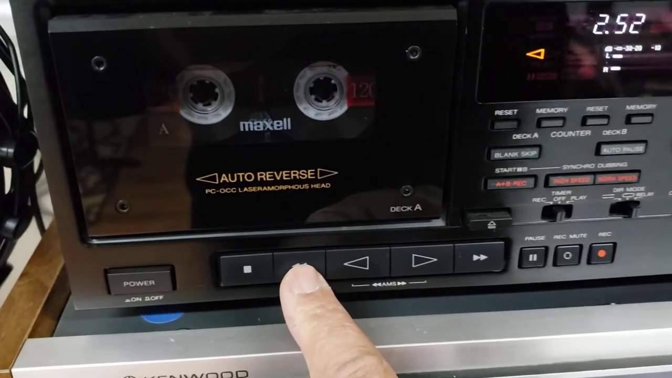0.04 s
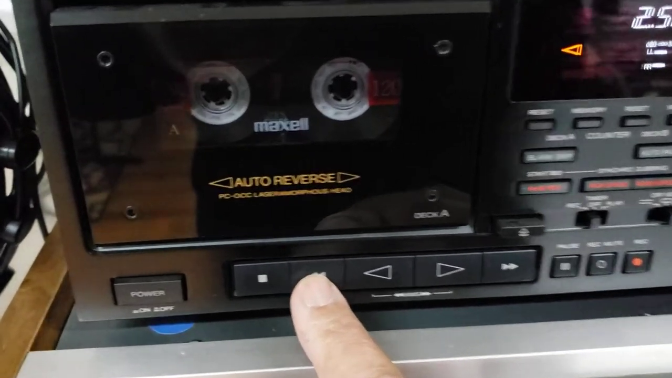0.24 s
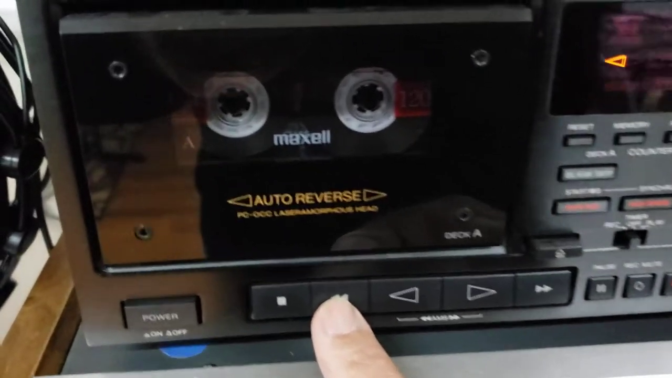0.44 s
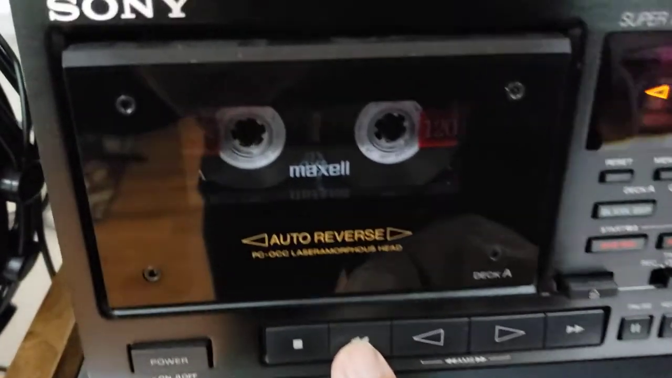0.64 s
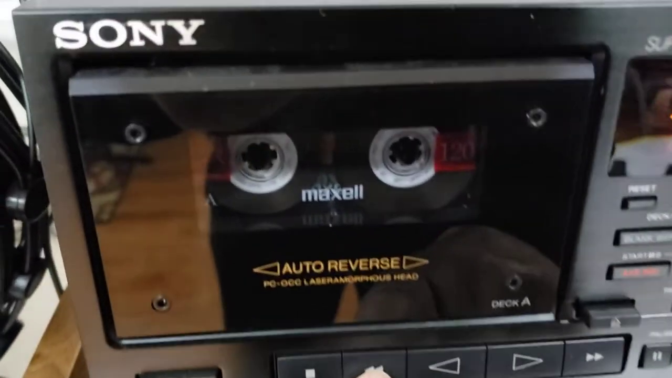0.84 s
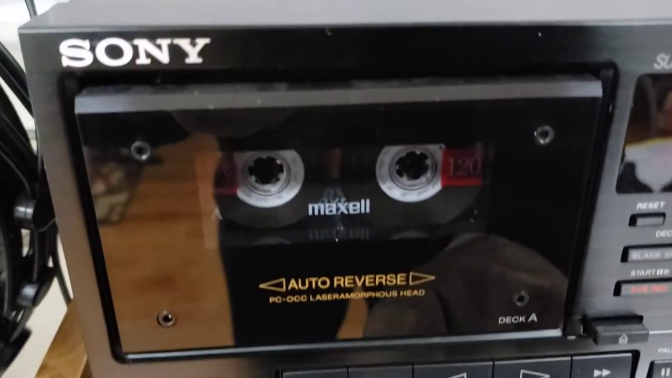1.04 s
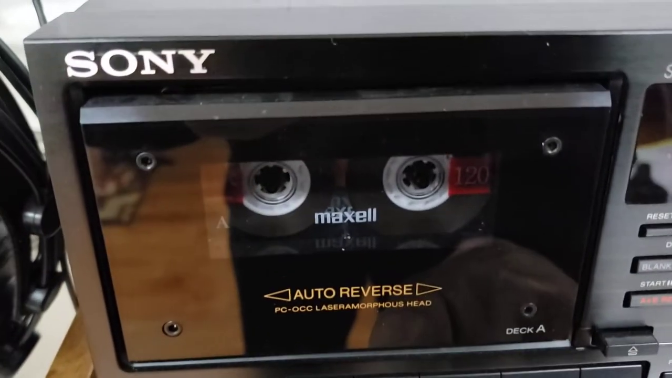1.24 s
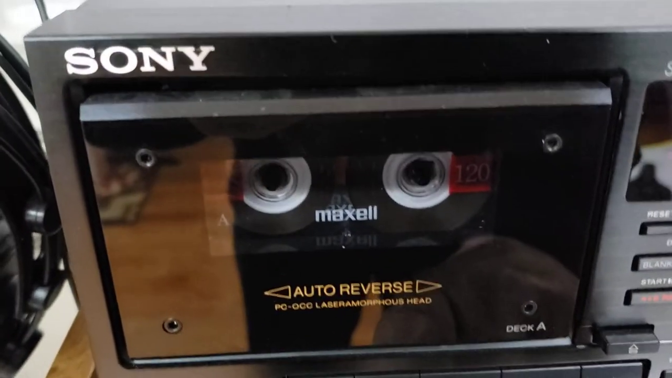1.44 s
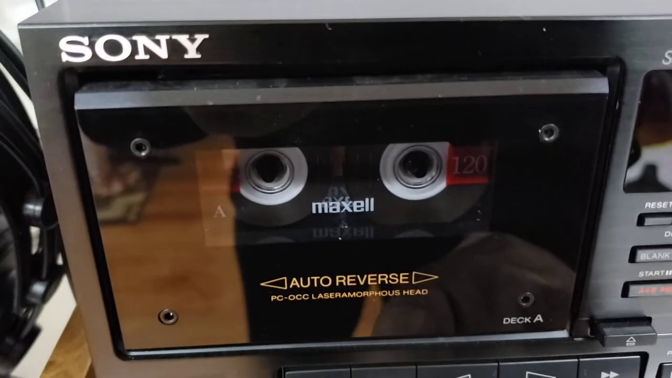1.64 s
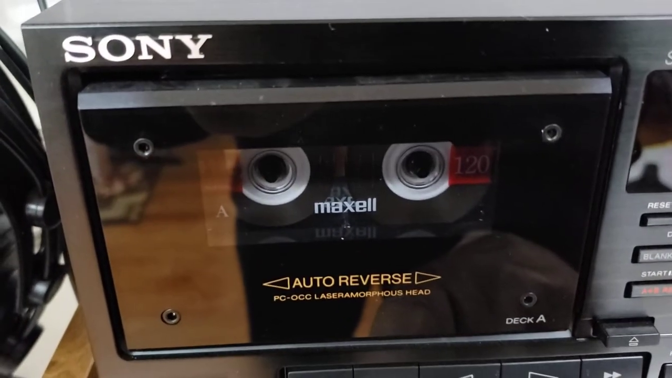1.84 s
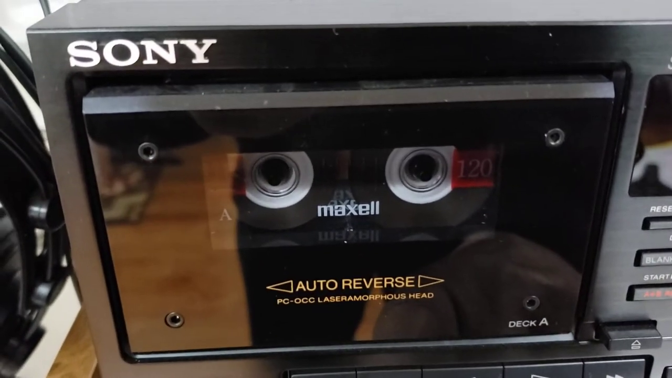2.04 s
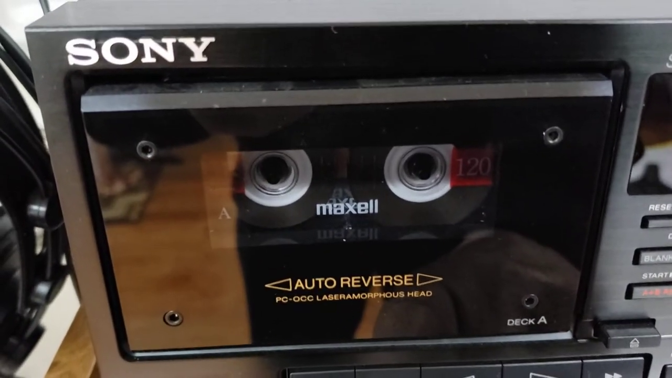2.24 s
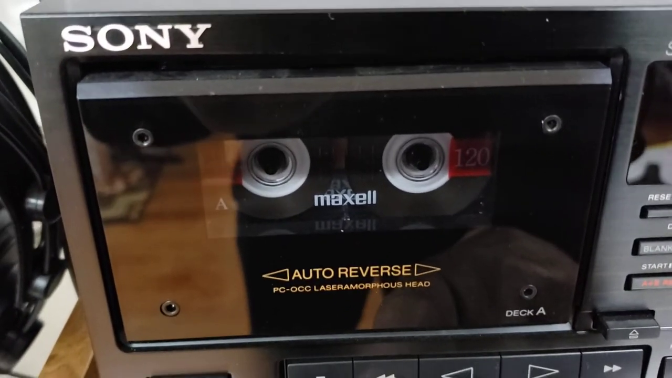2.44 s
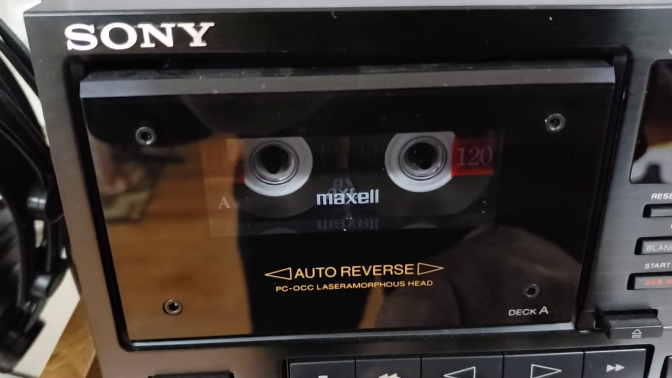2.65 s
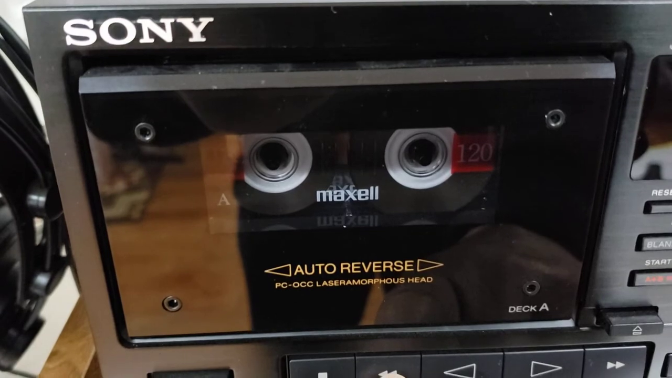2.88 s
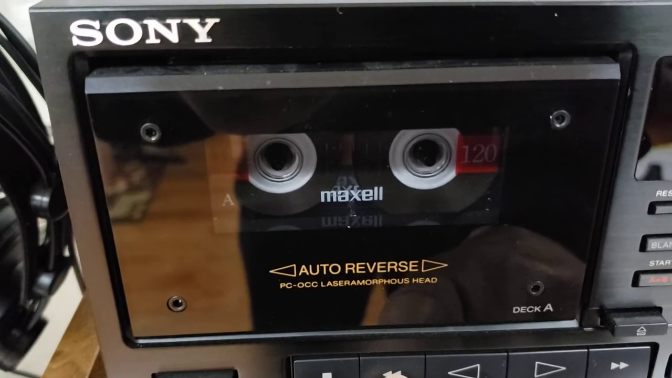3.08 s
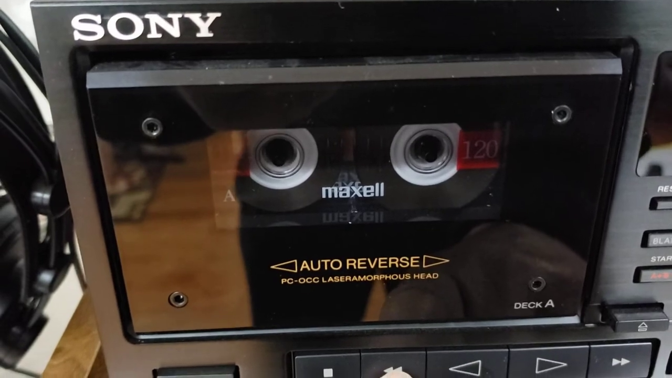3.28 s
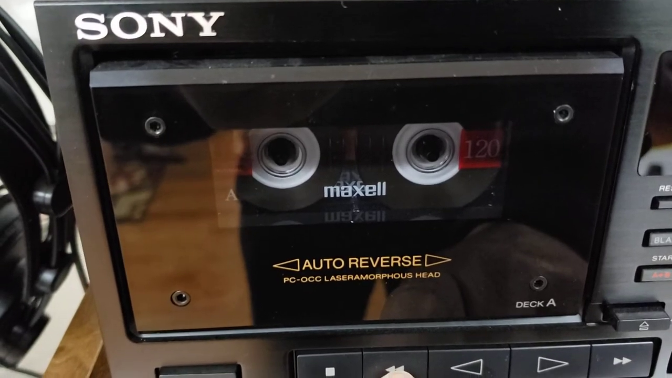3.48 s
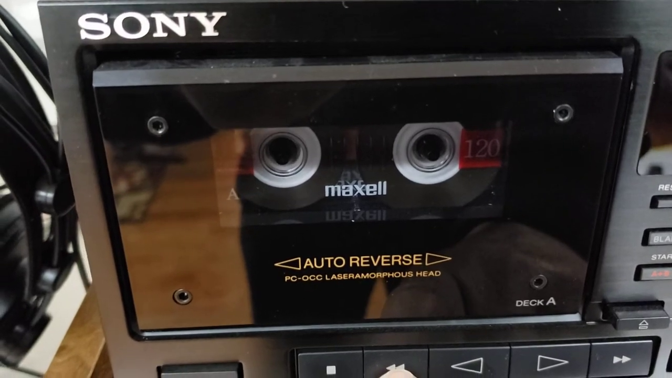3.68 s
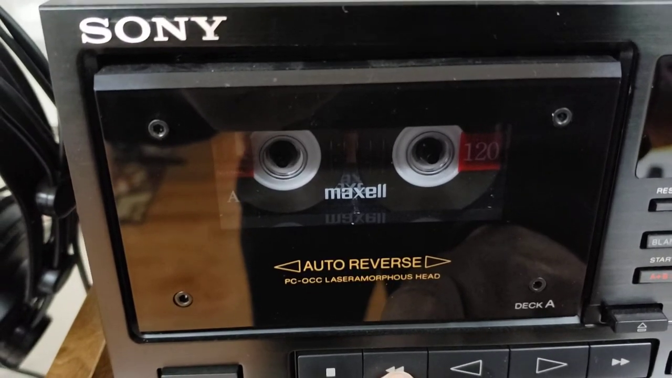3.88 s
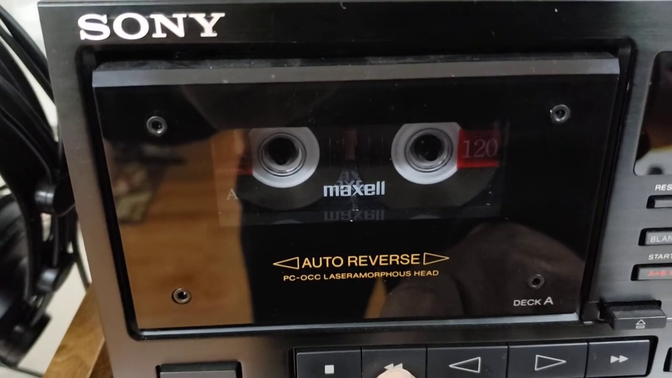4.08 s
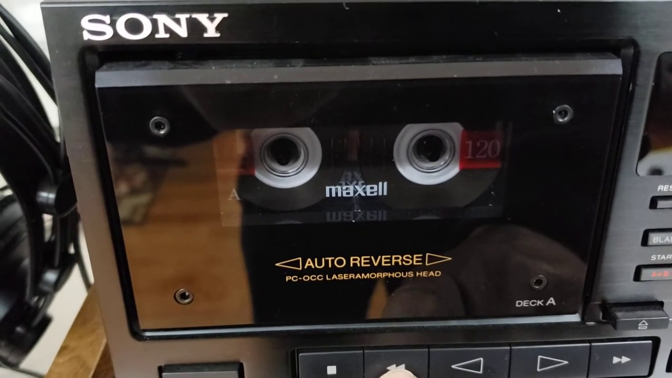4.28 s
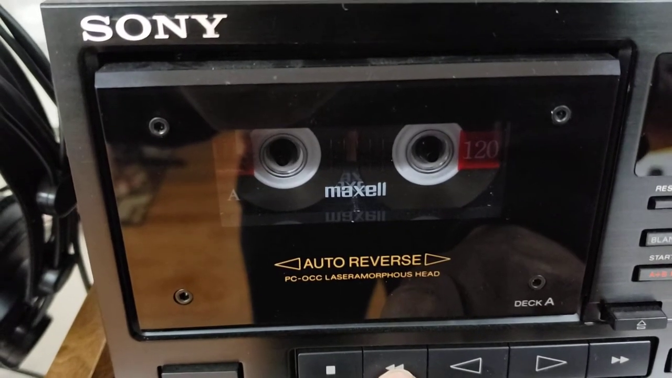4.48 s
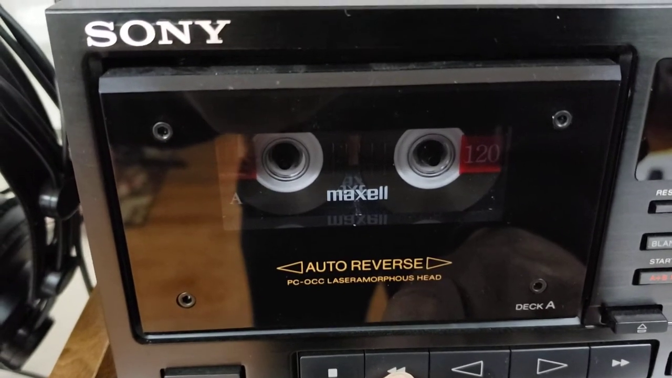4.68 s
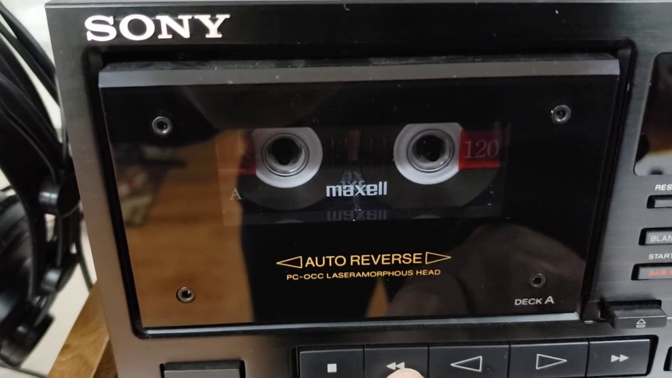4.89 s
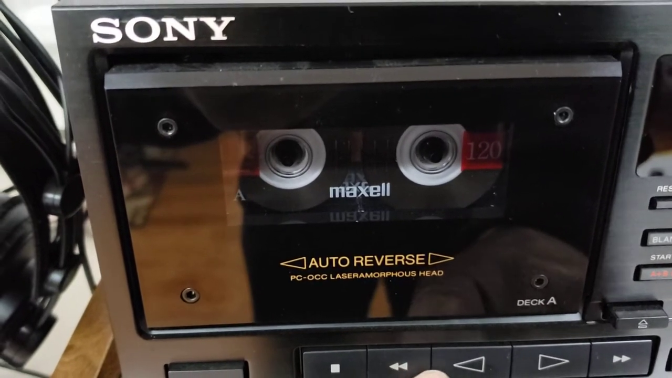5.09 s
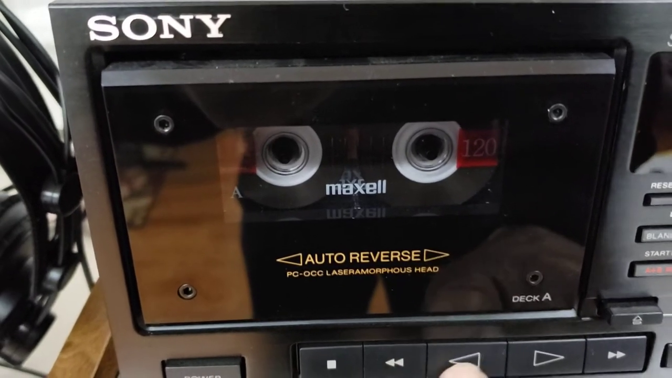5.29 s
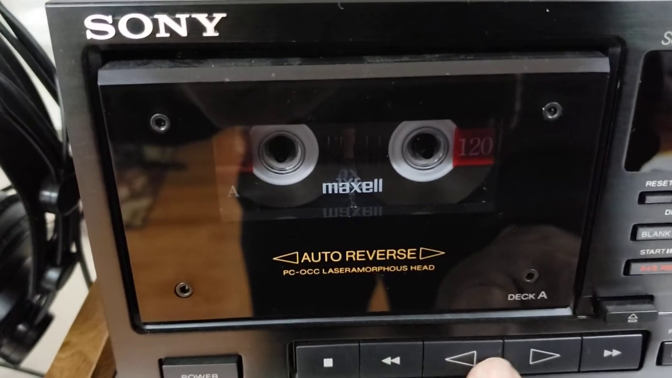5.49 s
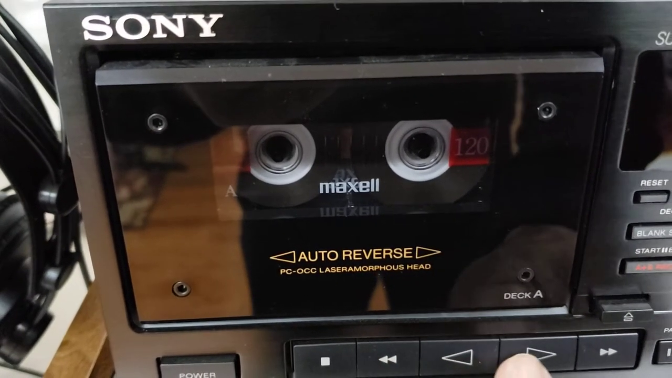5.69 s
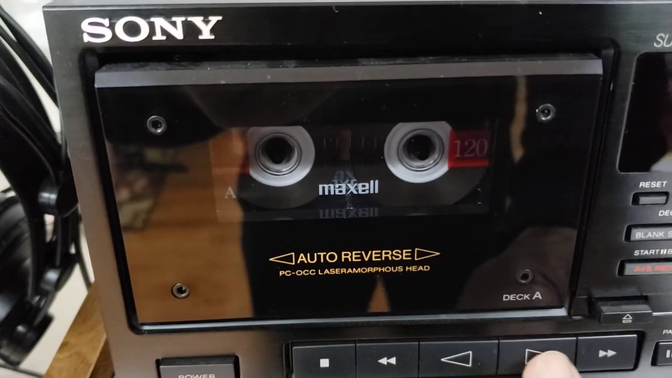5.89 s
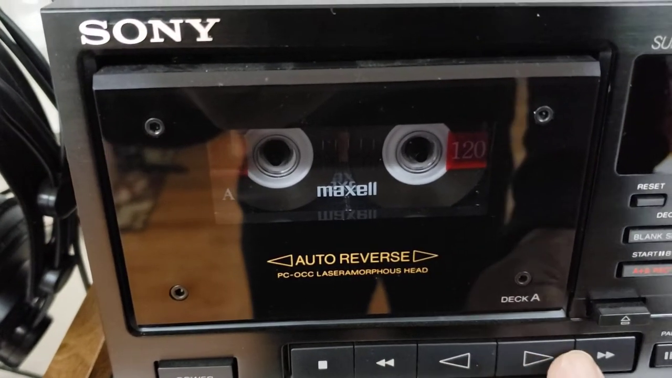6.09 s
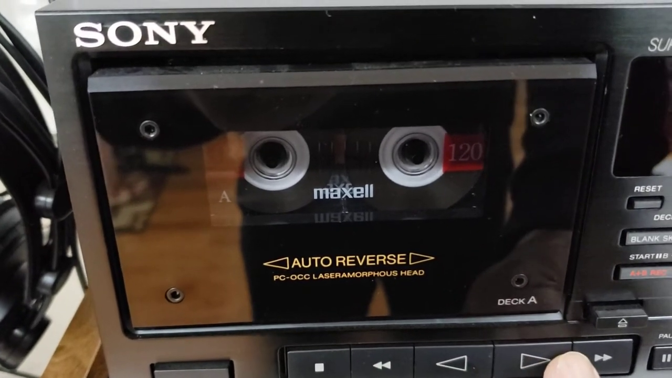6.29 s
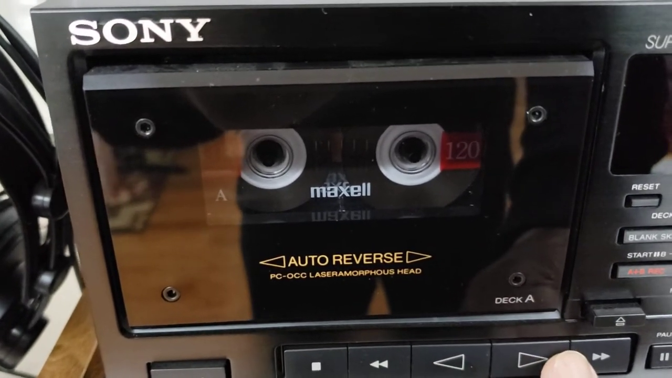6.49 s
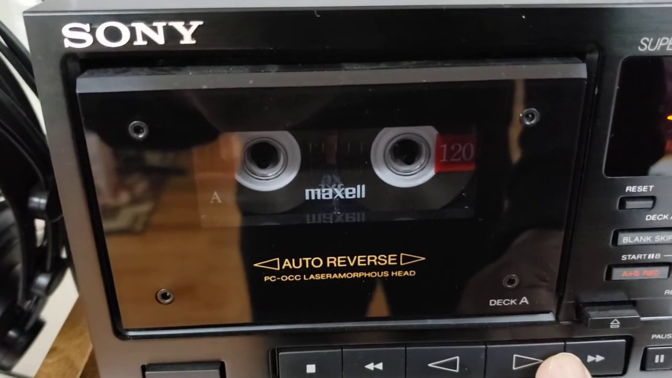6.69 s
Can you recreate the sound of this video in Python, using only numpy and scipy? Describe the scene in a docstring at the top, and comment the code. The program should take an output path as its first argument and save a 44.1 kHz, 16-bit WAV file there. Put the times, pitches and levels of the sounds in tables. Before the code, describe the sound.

A close stereo microphone catches a tape deck engaging rewind: one key clack, a brief gap, then a cluster of hard plastic clacks with hollow case thuds and gear grinding. The motor quickly climbs to speed and the reels whir steadily, slightly to the left, with a quivering mid-high whine, soft brushing hiss and intermittent thin ticking. The room is quiet and dry.

```python
"""A key clacks in a quiet small room; close by, a cassette deck clacks and thumps its way into rewind.
Each part is a burst of shaped noise that bounces twice, with decaying sine waves for the case below it.
A cam gear grinds in short runs of noise. Then the motor spins up: its gears whine as sine waves,
noise shaped by the shell and door whirs, and the tape hisses and brushes the shell once a reel turn.
In spells, the reel also knocks on the shell with thin ticks of bright noise."""
import sys
import numpy as np
from scipy.fft import rfft, irfft, next_fast_len
from scipy.io import wavfile
from scipy.ndimage import uniform_filter1d, map_coordinates

SR = 44100
rng = np.random.default_rng(int(sys.argv[2]) if len(sys.argv) > 2 else 0)


def dump(signal):
    """Clip the signal to [-1, 1] and save it as 16-bit WAV at the path in sys.argv[1]."""
    limited = np.clip(np.atleast_2d(signal).T, -1, 1)
    pcm = np.round(limited * 32767).astype(np.int16)
    wavfile.write(sys.argv[1], SR, pcm)


N = 296793  # length in samples

# The noise tables give only a tone's shape: noise() then brings it to the same overall strength.
# room floor: [f/Hz, level/dB per Hz]
AIR = [(25, -26), (70, -10), (300, -10), (1000, -20), (4000, -26), (16000, -29)]
# how alike left and right are: [f/Hz, likeness from 0 to 1]
ALIKE = [(60, .96), (290, .94), (640, .55), (1400, .3), (3000, .2), (15000, .15)]
# clacks of key and levers: [t/s, first contact level/dB, rebound level/dB over the first contact,
# thump delay/s, low thump level/dB, upper thump level/dB, hardness/dB and snap/dB over the contact,
# left over right/dB]; contact() and thump() add fixed offsets to these levels
CLACKS = [(0.05, -28, -1.5, 0.025, -40.5, -41, -18.5, -12.5, 3),
          (0.283, -42.5, 2, 0.027, -62.5, -56, -14, -10, 3.5),
          (0.389, -30, 2, 0.012, -54, -48, -10.5, -5.5, 2), (0.468, -31, -4.5, .022, -48, -47, -7, -6.5, 1),
          (0.58, -21.5, -11, .03, -36, -28, -6.5, -8, 0.5),
          (0.749, -22, -10, .002, -39.5, -30.5, -17, -15, 1.5),
          (0.775, -27, -9, 0.0039, -36, -44, -12, 0.5, -0.5), (0.818, -33, 0, .002, -45, -48, -12.5, -7, 0),
          (0.868, -26.5, -0.5, .012, -41.5, -41, -10, -5.5, -1.5),
          (0.949, -38, -12, 0.0037, -50, -52, -9.5, -20, 0), (0.973, -37, -5, 0.0041, -51, -49, -6, -4, 1),
          (0.991, -25.5, -6, .011, -33, -43, -11.5, -8.5, -1),
          (1.165, -40.5, -11, 0.0043, -70, -59, -11.5, 3.5, 3.5),
          (1.188, -33, -4.5, 0.0077, -50, -56, -19, -14, -2),
          (1.288, -26.5, -16, .004, -70, -46.5, -10, -8, 0.5),
          (1.367, -33, -6, 0.0039, -51, -44.5, -14, -7.5, -0.5),
          (1.428, -52, -9, 0.0039, -68, -59, -5, 14.5, 1),
          (1.476, -41.5, -12, 0.0039, -59, -54, -10.5, -3, 3), (1.5, -44, -12, .012, -56, -50, -15, 0.5, 1)]
# levers and door, broad tone: [f/Hz, level/dB per Hz]
PLASTIC = [(250, -15.5), (410, -4.5), (560, 1.5), (690, 1.5), (1100, 1), (1800, 2.5), (2150, -2.5),
           (2900, -1), (3400, -4.5), (4400, -3), (7000, -6.5), (8100, -14.5), (9200, -10), (14400, -9),
           (16000, -8)]
# ringing of the levers: [f/Hz, width/Hz, typical level/dB]
LEVERS = [(919, 29, 8.5), (1132, 110, 4.5), (1390, 180, 2), (1540, 45, 6), (1865, 86, -1.5),
          (2133, 78, -0.5), (2340, 92, 1), (2720, 92, 1), (3098, 56, 4), (3600, 31, 4), (4800, 65, -14),
          (4660, 25, -21), (5710, 110, -5.5), (6740, 110, -4.5), (11200, 250, -17), (11700, 250, -8.5),
          (12800, 160, -5), (15330, 230, -6)]
# extra lean of the clacks to the left: [f/Hz, left over right/dB]
CLACK_SIDE = [(300, 3.5), (1000, 5.5), (2200, 7), (4000, 5), (7000, 10.5), (9000, 1.5), (15000, -2)]
# ringing of the case and its chassis: [f/Hz, typical level/dB, time to fall 60 dB/s]
CASE_MODES = [(133.5, -11, 0.36), (165.1, -1.5, 0.35), (187.2, -7, 0.36), (236.2, -12.5, 0.37),
              (270, -2.5, 0.33), (304, -3, 0.29), (327.7, -8, 0.32), (520, -6, 0.17)]
# the shelf under the deck: [f/Hz, level/dB per Hz]
SHELF_THUD = [(20, -26), (40, -13), (58, 1), (80, -5), (115, -7), (170, 2), (300, -12.5), (420, -16),
              (900, -35)]
# runs of the cam gear: [t/s, length/s, starting level/dB]
CAM_RUNS = [(0.286, 0.69, -47), (0.75, .22, -42.5), (1.172, 0.062, -48), (1.356, 0.34, -54)]
# grinding of the cam gear: [f/Hz, level/dB per Hz]
CAM_TONE = [(40, -27), (110, -31), (165, 1.5), (215, -7), (270, -13), (325, 4), (410, -13.5), (520, -7.5),
            (800, -5.5), (1200, -12), (4000, -21), (16000, -26)]
# lean of the winding and cam sounds to the left: [f/Hz, left over right/dB]
WHIR_SIDE = [(60, 3.5), (92, 9), (140, 4), (210, 3.5), (330, 4), (500, 6.5), (770, 4), (1170, 8.0),
             (1790, 8), (2740, 10.5), (4190, 3.5), (6410, 9.5), (9810, 2.5), (15000, 0.5)]
# how strongly the deck winds: [t/s, share of full strength]
DRIVE = [(1.25, 0), (1.45, .65), (1.62, 1)]
# low rumble of winding: [f/Hz, level/dB per Hz]
RUMBLE = [(15, -58), (25, -28), (41, -22), (60, 1.5), (134, -13), (161, 5.5), (195, -8.5), (220, -5),
          (313, 1), (385, -18.5), (450, -58), (580, -31), (990, -120)]
# motor hum, loudest while it pulls the reels up to speed: [t/s, level/dB]
STRAIN = [(1.4, -83), (1.58, -61), (1.68, -66), (1.85, -74), (5.6, -70.5), (6.6, -67)]
# ringing of the cassette shell and door: [f/Hz, width/Hz, level/dB]
DOOR = [(708, 12, -8.5), (784, 74, -6), (905.5, 39, -1.5), (1114, 53, -9), (1334, 102, -1),
        (1750, 55, -13.5), (2006, 40, -6), (2270, 55, -7.5), (2590, 123, -4), (3123, 36, -8.5),
        (3360, 53, -7.5), (3860, 58, -9), (4100, 51, -9), (4600, 240, -17.5), (5510, 49, -10),
        (6040, 46, -12), (6340, 31, -10), (7220, 50, -10), (9020, 190, -19.5)]
# rubbing of wheels and hubs: [f/Hz, level/dB per Hz]
RUBBING = [(240, -47), (400, -40.5), (520, -16.5), (690, -17), (930, -12), (1200, -11.5), (1480, -9),
           (1900, -16), (2800, -13), (3600, -18), (4400, -16), (5300, -20.5), (6900, -18.5), (8150, -30.5),
           (9000, -21), (12000, -29), (19000, -87)]
# tape hiss: [f/Hz, level/dB per Hz]
HISS = [(4710, -13.5), (8000, -2), (11200, -1.5), (12300, 0.5), (13300, -4.5), (15100, 7.5), (16000, -14.5)]
# tape brush and reel tick: [f/Hz, level/dB per Hz]
TICK = [(1000, -38), (4000, -18), (7000, -11), (8200, -17), (10500, -6), (13000, -6.5), (16000, -7)]
# spells of reel knocks: [t/s, length/s, first tick level/dB, later ticks level/dB];
# reel_ticks() lifts all these levels by 3 dB
TICK_SPELLS = [(1.794, 0.25, -47, -45.5), (2.2204, .02, -44, -50), (2.74, 0.47, -44, -43.5),
               (3.785, .16, -48, -44.5), (3.982, 0.23, -38.5, -44.5), (4.4514, .02, -45, -50),
               (4.7367, .07, -44, -46), (5.034, 0.13, -45, -51), (5.46, 0.021, -40.5, -50),
               (5.7925, 0.33, -39, -45.5), (6.1326, .11, -33.5, -43.5)]

RIGHT_LAG_S = .00015  # noise reaches the right channel this much after the left
REBOUND_S, REBOUND_LOSS_DB = .0105, 8  # time between bounces; how much weaker the second bounce is
EARLY_THUMP_DB = -6.0  # jolt at the contact itself, relative to the main thump that follows
CHATTER_DB = 3  # starting depth of the rattle after a contact
CAM_ATTACK_S, CAM_SAG_DB_PER_S, CAM_RELEASE_S = 0.026, 35, 0.23  # release: time to fall 60 dB
TEETH, REEL_TEETH = 30, 65  # teeth that pass per motor turn and per reel turn
MOTOR_START_S, SPIN_UP_S = 1.3, .22
START_HZ, RUN_HZ = 800, 1364  # teeth a second before spin-up and at full speed
OVERSHOOT_HZ, OVERSHOOT_AT_S, OVERSHOOT_S = 45, 1.98, .33  # the motor races briefly
WOW_HZ, WOW_PERIOD_S, WOW_CREST_S = 7, .84, 2.92  # slow swing of the tooth rate
SPELL_HISS_DB = 1.5  # the tape sounds louder while the reel knocks
OFF_TURN_DB, TICK_SCATTER_DB, TICK_SIDE_DB = -1, 1.5, -1  # every other turn; random spread; left over right
TOP_HZ = 15900  # middle of the treble cutoff


def amp(db):
    """Turn decibels into a plain multiplier."""
    return 10 ** (np.asarray(db) / 20)


def unit(x):
    """Scale a sound to an rms (average strength) of 1."""
    return x / np.sqrt(np.mean(x ** 2) + 1e-20)


def along(points, hz):
    """Read (f/Hz, value) points at any frequency, on a log axis."""
    f, v = np.transpose(points)
    return np.interp(np.log(hz + 1), np.log(f + 1), v)


def curves(rows):
    """One value per sample for each column after the time."""
    s, *cols = np.transpose(rows)
    return [np.interp(np.arange(N) / SR, s, c) for c in cols]


def wobble(rate, size=N):
    """A smooth random curve with the given number of knots a second."""
    knots = rng.standard_normal(int(size * rate / SR) + 4)
    return map_coordinates(knots, [np.arange(size) * rate / SR])


def pan(db):
    """Left and right gains for a level difference."""
    gains = np.array([amp(np.atleast_1d(db) / 2), amp(-np.atleast_1d(db) / 2)])
    return gains / np.sqrt(np.mean(gains ** 2, axis=0))


def noise(gain, side, size=N):
    """Stereo noise of rms 1, shaped by frequency: alike in the bass, mostly unrelated in the treble."""
    m = next_fast_len(size)
    hz = np.fft.rfftfreq(m, 1 / SR)
    a, b = rfft(rng.standard_normal((2, m)))
    # mixing two noises at this angle sets how alike left and right are
    angle = np.arccos(np.clip(along(ALIKE, hz), -1, 1)) / 2
    left = np.cos(angle) * a + np.sin(angle) * b
    right = np.cos(angle) * a - np.sin(angle) * b
    pair = np.array([left, right * np.exp(-2j * np.pi * hz * RIGHT_LAG_S)])
    shaped = pair * gain(hz) * pan(along(side, hz))
    return unit(irfft(shaped, m)[:, :size])


def colour(points):
    """Gain by frequency from (f/Hz, level/dB) points."""
    return lambda hz: amp(along(points, hz))


def resonances(modes, hz):
    """Gain by frequency of (f/Hz, width/Hz, level/dB) resonances."""
    power = sum(amp(2 * db) / (1 + (2 * (hz - centre) / width) ** 2) ** 2 for centre, width, db in modes)
    return np.sqrt(power)


def fade(t, t60):
    """A steady dying away that falls 60 dB in t60 seconds."""
    return amp(-60 * t / t60)


def add(track, s, sound):
    """Mix a sound in at a time in seconds."""
    start = max(round(s * SR), 0)
    track[:, start:start + sound.shape[1]] += sound[:, :N - start]


def room_air():
    """The quiet room is a steady floor of noise."""
    return amp(-73.0) * noise(colour(AIR), [(100, 2.9), (10000, 1.1)])


def contact(db, hard_db, snap_db):
    """One contact cracks, rings the levers and lingers in the room."""
    t = np.arange(SR // 3) / SR
    hz = np.fft.rfftfreq(next_fast_len(len(t)), 1 / SR)
    # ring and room tail in three bands; the ring dies later in the clack than in knock or crack
    knock = amp(-1.5) * fade(t, 0.093) + amp(-8) * fade(t, 0.39)
    clack = amp(-5.0) * fade(t, 0.13) + amp(-14) * fade(t, 0.38)
    crack = amp(-7) * fade(t, 0.12) + amp(-15.5) * fade(t, 0.34)
    above_knock = 1 / (1 + (2700 / (hz + 1)) ** 6)
    above_clack = 1 / (1 + (8300 / (hz + 1)) ** 8)
    # the first impact lasts a few milliseconds and stands out most in heavy blows
    impact = amp(1.0 + np.interp(db, [-27, -19], [0, 8])) * fade(t, .025)
    # every contact rings the levers at new strengths
    struck = np.array(LEVERS) + np.outer(rng.normal(0, 3, len(LEVERS)), [0, 0, 1])
    plastic = np.hypot(amp(along(PLASTIC, hz)), amp(1.5) * resonances(struck, hz))

    def band(share):
        return noise(lambda _: plastic * np.sqrt(share), CLACK_SIDE, size=len(t))

    hit = amp(-10.0) * (knock + amp(-9.0) * impact) * band(1 - above_knock)
    hit += amp(hard_db + 0.5) * (clack + amp(-5.0) * impact) * band(above_knock * (1 - above_clack))
    hit += amp(snap_db + 1.5) * (crack + impact) * band(above_clack)
    # a dull contact builds up more slowly than a snapping one
    hit *= 1 - np.exp(-t / np.interp(snap_db, [-16, -11], [.003, .001]))
    # loose parts chatter for a moment after the blow
    chatter = amp(CHATTER_DB * wobble(300, size=len(t)) * fade(t, .6))
    return amp(db) * hit * chatter


def case_ring(t, low_db, upper_db, swell=0.0057):
    """The case's ringing tones swell after a blow, with separate strengths for low and upper ones."""
    ring = np.zeros(len(t))
    for hz, db, t60 in CASE_MODES:
        weight_db = np.interp(hz, [180, 250], [low_db, upper_db])
        level = amp(db + weight_db + rng.normal(0, 1))
        ring += level * fade(t, t60) * np.sin(2 * np.pi * (hz * t + rng.random()))
    return ring * (1 - np.exp(-t / swell))


def thump(low_db, upper_db):
    """A blow rings the case and thuds into the shelf."""
    t = np.arange(SR // 2) / SR
    shape = fade(t, 0.49) * (1 - np.exp(-t / 0.014))
    thud = amp(low_db - 7.5) * noise(colour(SHELF_THUD), [(100, 3.4)], size=len(t)) * shape
    return amp(-1.0) * case_ring(t, low_db, upper_db) * pan(2.5) + thud


def transport():
    """Each part hits its stop and bounces twice; the chassis jolts at once and thumps as it settles."""
    out = np.zeros((2, N))
    for s, db, rebound_db, delay_s, low_db, upper_db, hard_db, snap_db, side_db in CLACKS:
        for k, bounce_db in enumerate([0, rebound_db, rebound_db - REBOUND_LOSS_DB]):
            add(out, s + k * REBOUND_S, contact(db + bounce_db, hard_db, snap_db) * pan(side_db))
        add(out, s, amp(EARLY_THUMP_DB) * thump(low_db, upper_db))
        add(out, s + delay_s, thump(low_db, upper_db))
    return out


def cam():
    """The cam gear grinds unevenly as it shifts the mechanism: each run bites, eases off and dies away."""
    level = np.zeros(N)
    for s, length, db in CAM_RUNS:
        t = np.maximum(np.arange(N) / SR - s, 0)
        attack = np.minimum(t / CAM_ATTACK_S, 1)
        release = fade(np.maximum(t - length, 0), CAM_RELEASE_S)
        level += amp(db - CAM_SAG_DB_PER_S * t) * attack * release
    return level * amp(1.35 * wobble(44.3)) * noise(colour(CAM_TONE), WHIR_SIDE)


def winding_rumble(drive):
    """Low noise rises with the strength of the winding."""
    return amp(-73.0) * drive * noise(colour(RUMBLE), WHIR_SIDE)


def tooth_rate():
    """The motor spins up, overshoots, then runs with a slow wow (a swing in speed)."""
    t = np.arange(N) / SR
    lag = np.exp(-(np.maximum(t - MOTOR_START_S, 0) / SPIN_UP_S) ** 1.5)
    overshoot = OVERSHOOT_HZ * np.exp(-((t - OVERSHOOT_AT_S) / OVERSHOOT_S) ** 2)
    wow = WOW_HZ * np.cos(2 * np.pi * (t - WOW_CREST_S) / WOW_PERIOD_S)
    return RUN_HZ - (RUN_HZ - START_HZ) * lag + overshoot + wow


def wheel_angles(teeth):
    """The count of passed teeth gives the angles of motor and reel, in radians."""
    return 2 * np.pi * teeth / TEETH, 2 * np.pi * teeth / REEL_TEETH


def gears(teeth, drive):
    """Meshing teeth whine; off-centre wheels throb it once a motor turn and twice a reel turn."""
    motor, reel = wheel_angles(teeth)
    throb = 1 + .52 * np.cos(motor) + .46 * np.cos(2 * reel)
    mesh = 2 * np.pi * teeth - 0.17 * np.sin(motor) + 0.65 * wobble(40)
    whine = unit(throb * amp(0.65 * wobble(25)) * np.sin(mesh))
    # the door rings along fully only once the tooth rate has climbed to its resonance
    door_db = np.interp(tooth_rate(), [1150, 1330], [-8, 0])
    # the motor hums an octave below the whine
    strain_db, = curves(STRAIN)
    hum = amp(strain_db + 2.7 * wobble(30)) * np.sin(mesh / 2 + 1.1 * wobble(25))
    second = amp(-71.0) * np.sin(2 * mesh + wobble(60))
    third = amp(-77) * np.sin(3 * mesh + wobble(60))
    return drive * (amp(door_db - 60.5) * whine + hum + throb * (second + third)) * pan(7.5)


def whir(teeth, drive):
    """Rubbing wheels and hubs excite the shell and door, whose ringing pulses with each turn."""
    motor, reel = wheel_angles(teeth)
    pulsing = 1 + .27 * np.cos(reel) + .16 * np.cos(motor)
    ringing = noise(lambda hz: resonances(DOOR, hz), WHIR_SIDE) * pulsing * amp(0.38 * wobble(11))
    rubbing = noise(colour(RUBBING), WHIR_SIDE) * amp(0.71 * wobble(60))
    return drive * (amp(-57.0) * ringing + amp(-55.0) * rubbing)


def knocking():
    """A smooth curve that rises towards 1 in the reel's spells of knocking and falls back to 0."""
    t = np.arange(N) / SR
    inside = sum((t > s) & (t < s + length) for s, length, *_ in TICK_SPELLS)
    return uniform_filter1d(np.minimum(inside, 1.0), size=SR // 6)


def tape(teeth, drive):
    """The tape hisses and brushes the shell once a reel turn, with a random strength each time."""
    turns = teeth / REEL_TEETH
    strength_db = rng.uniform(-9, 3, int(turns[-1]) + 1)[turns.astype(int)]
    part = turns % 1  # how far through the current turn
    brush = amp(strength_db) * np.exp(-part / 0.16) * (1 - np.exp(-part / 0.04))
    hiss = noise(colour(HISS), WHIR_SIDE) * amp(2.1 * wobble(83))
    brushing = brush * noise(colour(TICK), WHIR_SIDE)
    return drive * amp(SPELL_HISS_DB * knocking()) * (amp(-60.0) * hiss + amp(-51.0) * brushing)


def reel_ticks():
    """In spells the reel knocks against the shell once a turn with thin, bright ticks."""
    out, t = np.zeros((2, N)), np.arange(SR // 8) / SR
    shape = (1 - np.exp(-t / 0.00093)) * (fade(t, 0.018) + amp(-15) * fade(t, 0.18))
    turn_s = REEL_TEETH / RUN_HZ
    for s, length, first_db, later_db in TICK_SPELLS:
        for k in range(int(length / turn_s) + 1):
            db = first_db
            if k:
                db = later_db + OFF_TURN_DB * (k % 2) + rng.normal(0, TICK_SCATTER_DB)
            tick = shape * noise(colour(TICK), [(1000, 8), (7000, 12), (11000, 3)], size=len(t))
            add(out, s + k * turn_s, amp(db + 3) * tick * pan(TICK_SIDE_DB))
    return out


def scene():
    """Mix all sources; one tooth count turns the gears, whir and tape together."""
    teeth = np.cumsum(tooth_rate() * (1 + 0.002033 * wobble(8))) / SR
    drive, = curves(DRIVE)
    mechanism = room_air() + transport() + cam()
    winding = winding_rumble(drive) + gears(teeth, drive) + whir(teeth, drive) + tape(teeth, drive)
    return mechanism + winding + reel_ticks()


def record(dry):
    """Cut the treble with a narrow slope, 200 Hz wide, around the band limit."""
    m = next_fast_len(N + SR // 2)
    hz = np.fft.rfftfreq(m, 1 / SR)
    keep = np.clip((TOP_HZ - hz) / 200 + .5, 0, 1)
    return irfft(rfft(dry, m) * keep, m)[:, :N]


dry = scene()
out = record(dry)
dump(out)
```